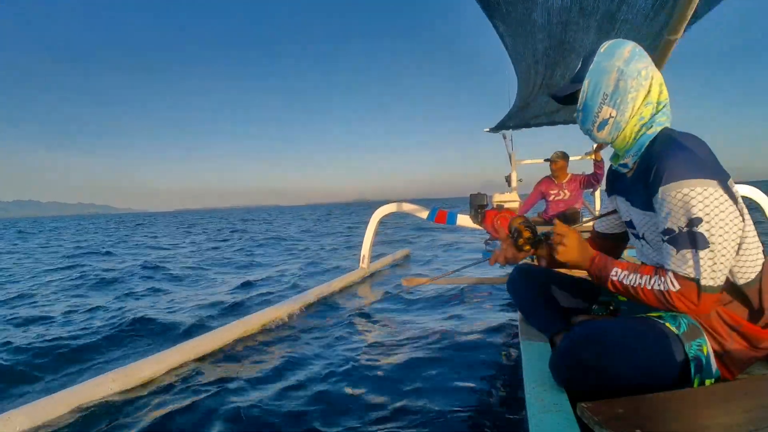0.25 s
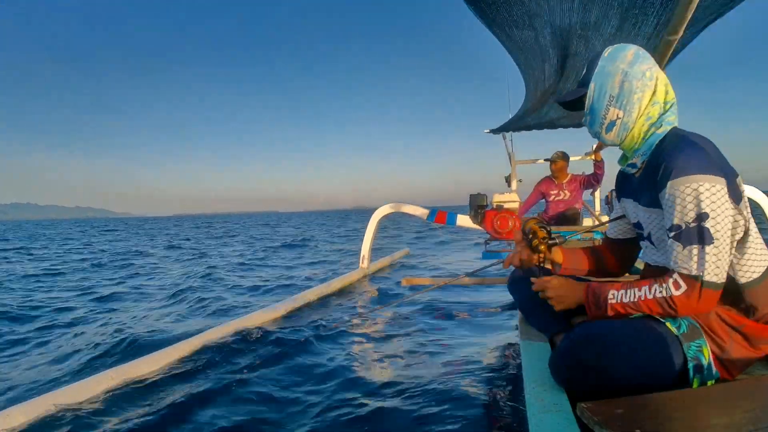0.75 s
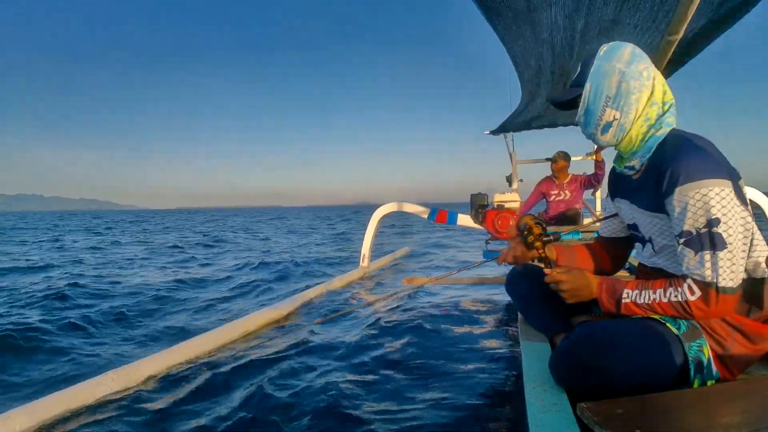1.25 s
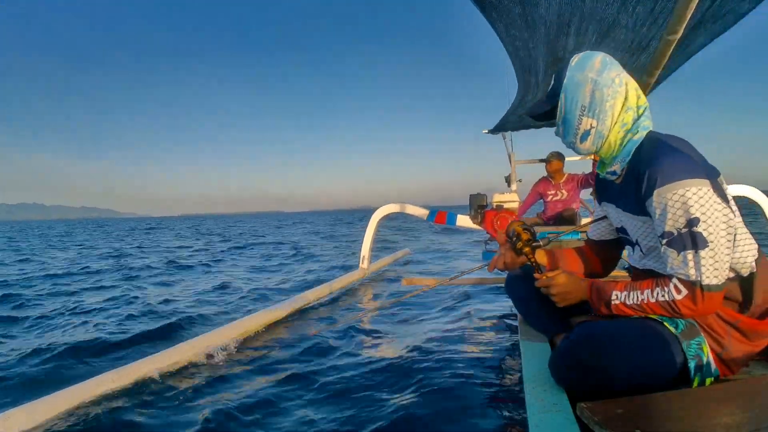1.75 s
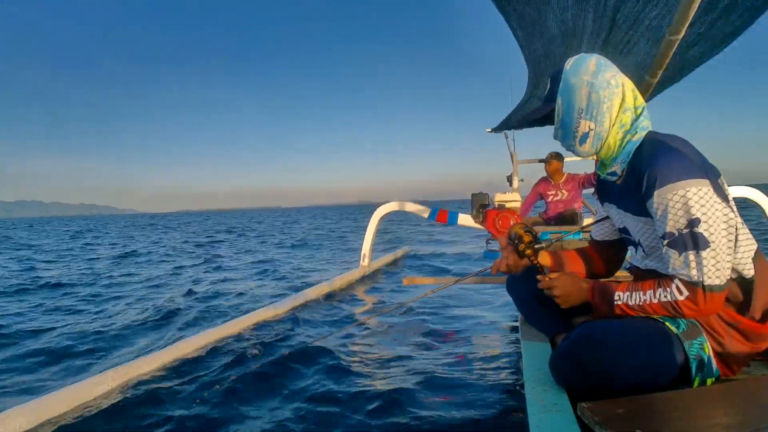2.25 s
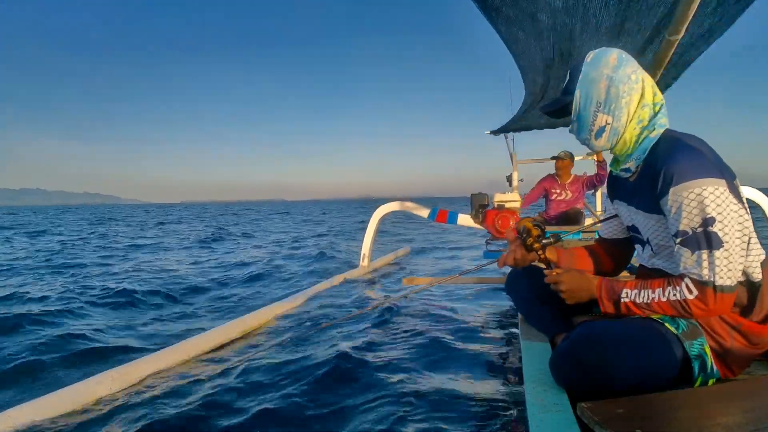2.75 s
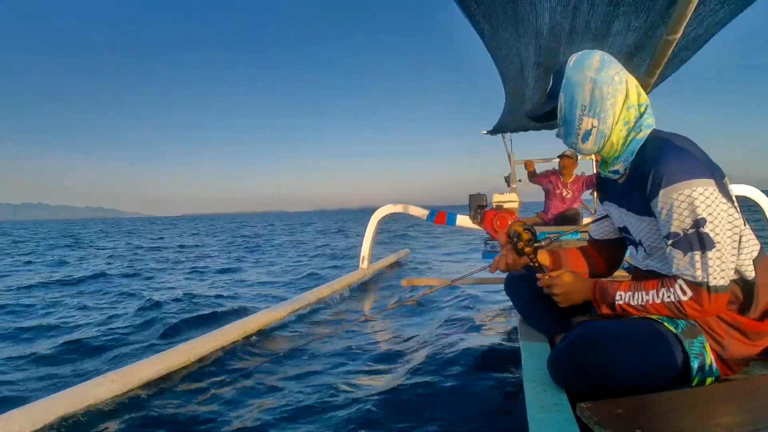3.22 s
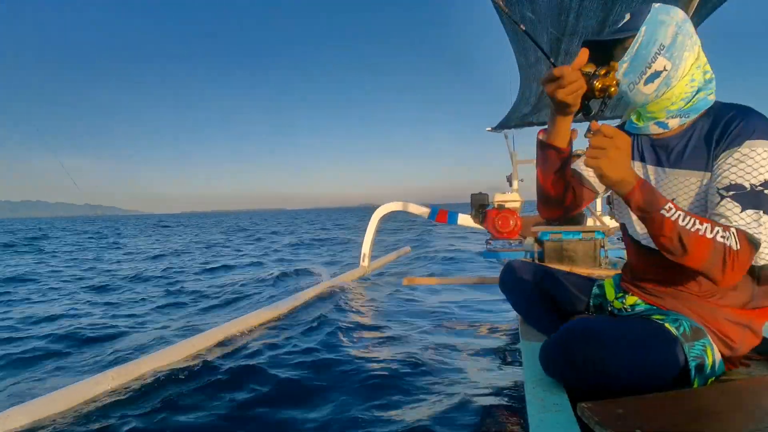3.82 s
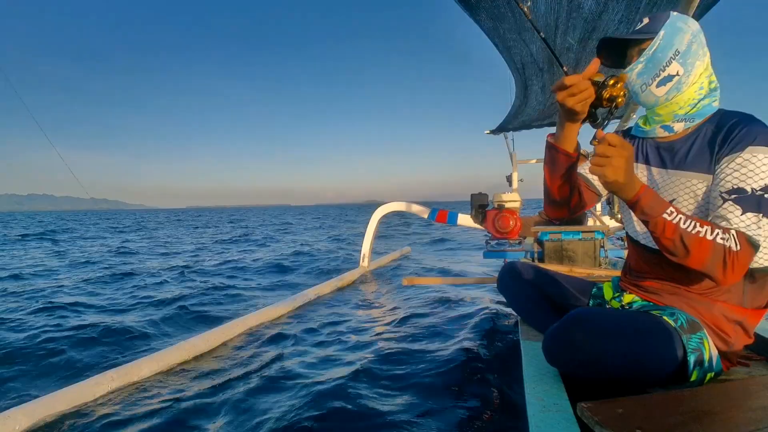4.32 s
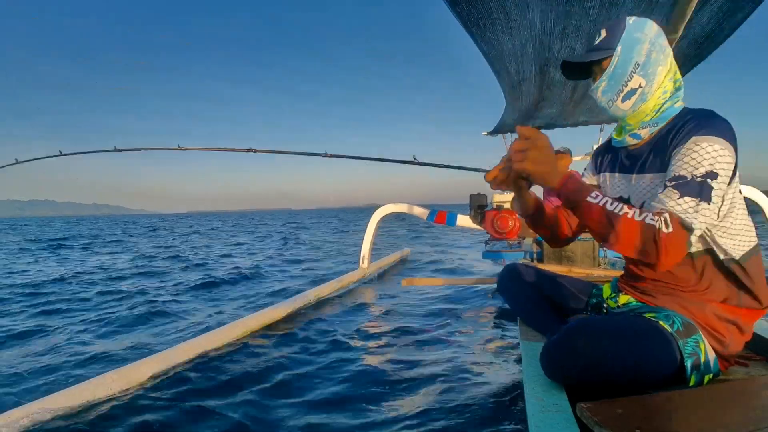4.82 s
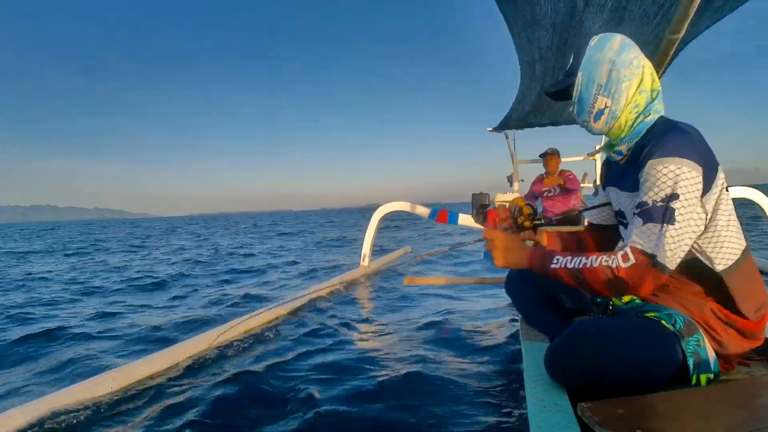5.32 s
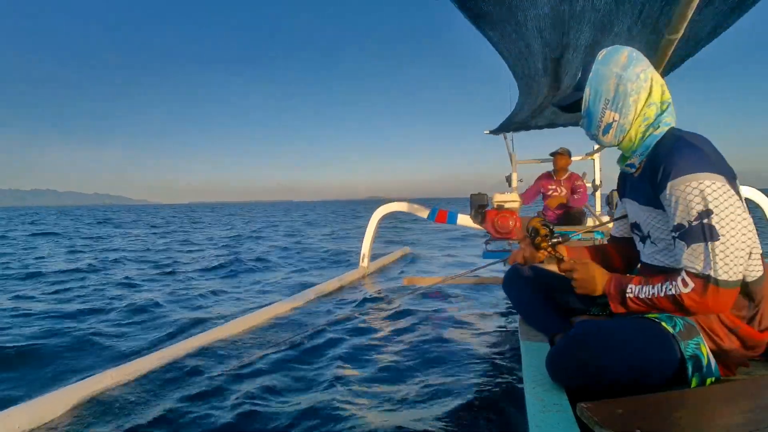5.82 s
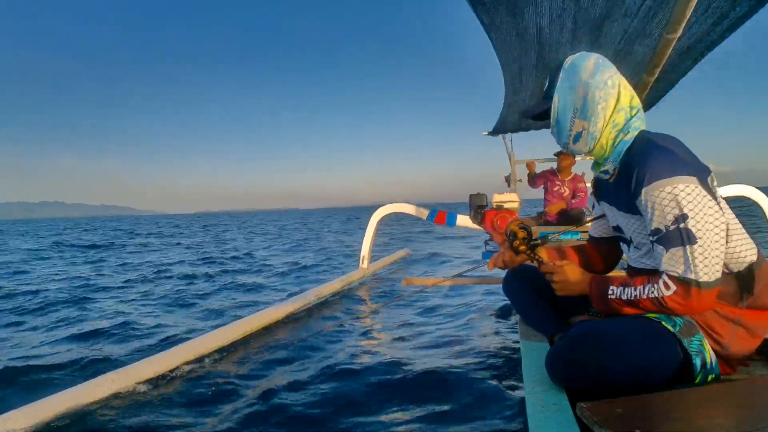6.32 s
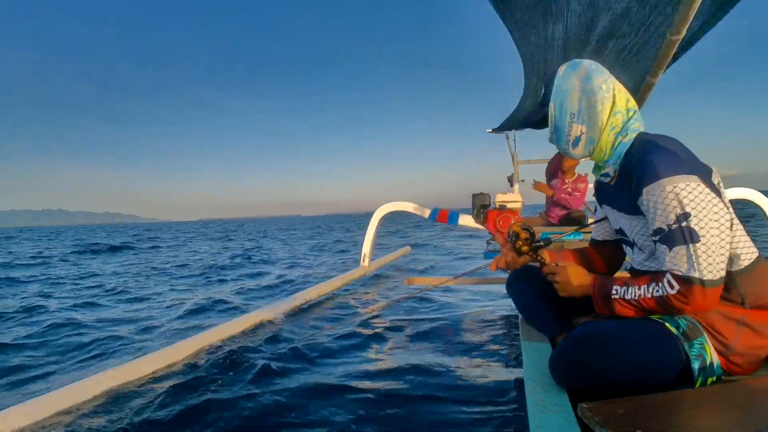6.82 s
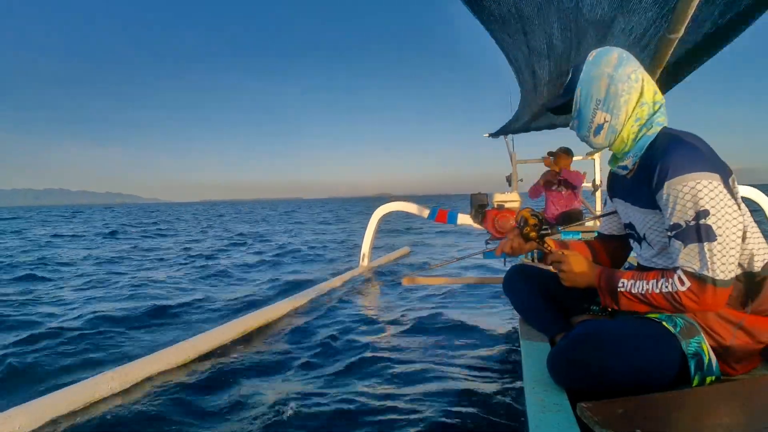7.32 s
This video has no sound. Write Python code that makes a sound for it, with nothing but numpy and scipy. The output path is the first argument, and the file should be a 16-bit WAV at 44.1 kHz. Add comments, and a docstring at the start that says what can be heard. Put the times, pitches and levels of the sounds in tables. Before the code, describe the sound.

On a small wooden boat at sea, deep wind buffets thud on the exposed microphone throughout. Close water gurgles and fizzes along the hull with bubbles popping. A reel whirs at the start, slowing to a stop after one second; a second, louder whir comes around five seconds with a sharp splash. Knocking slaps and livelier splashing follow. Open water hisses faintly behind.

```python
"""Outrigger boat at sea, in the wind

A small camera microphone on board is buffeted by wind: noise pressed on the membrane in gusts.
Along the hull wavelets gurgle and fizz (crowds of dying tones over hiss), single bubbles pop and
droplets spray (noise bursts). Slaps ring the planks, and close by a fishing reel whirs twice, its
gear teeth pulsing friction noise. Far off, open water hisses evenly."""
import sys
import numpy as np
from scipy import signal
from scipy.fft import rfft, irfft
from scipy.io import wavfile
from scipy.ndimage import uniform_filter1d

SR = 44100
rng = np.random.default_rng(int(sys.argv[2]) if len(sys.argv) > 2 else 0)


def wav_out(sig):
    """Save sig, one row per channel (or a flat mono array), as 16-bit PCM at SR to the path in sys.argv[1]."""
    wavfile.write(sys.argv[1], SR, np.round(np.clip(np.atleast_2d(sig).T, -1, 1) * 32767).astype(np.int16))


N = 333616  # length in samples

# Far off, the colour of open water. Each row: frequency in Hz, relative level in dB per Hz.
SEA_SPECTRUM = [(88, -44), (150, 14.5), (563, -8.5), (657, -11), (1270, -54), (4010, -18), (6780, -22.5),
                (14500, -21.5), (15600, -26)]
SEA_DB = -43.5  # rms

# Along the hull, water working between wavelets. Each row: time in seconds, level in dB.
LAPPING_LEVEL = [(0, -47), (.35, -46.5), (.85, -44.5), (1.1, -50.5), (1.35, -44), (1.8, -42), (2.3, -41.5),
                 (2.65, -44.5), (3.3, -42.5), (3.6, -44), (4.2, -47.5), (4.8, -46), (5.35, -38),
                 (5.65, -41.5), (6.0, -44.5), (6.65, -39.5), (7.0, -45), (7.56, -37.5)]
LAPPING_BRIGHT_DB = -1.5  # brightness between wavelets, dB gained per octave
# Wavelets breaking on the hull. Each row: peak in seconds, peak level in dB, seconds to rise 10 dB,
# seconds to fall 10 dB (0 stops at once), brightness in dB gained per octave.
WAVELETS = [(.48, -41, 0.13, 0.1, 0.1), (.71, -39.5, 0.18, 0.07, -2), (1.04, -47, .04, 0.1, -1),
            (1.26, -42.5, .12, 0, 0), (1.46, -41, .1, 0, 1), (1.63, -39, 0.02, 0.2, -2.5),
            (1.83, -42.5, 0.1, 0.7, 2), (1.95, -36.5, 0.03, 0.17, -1.5), (2.09, -39.5, 0.13, .06, 0.5),
            (2.49, -40, 0.03, 0.17, 0), (2.83, -34.5, .15, .22, 1.3), (2.95, -30.5, 0.14, 0.18, -3.5),
            (3.82, -34.5, .14, 0.06, 1.5), (4.05, -35, 0.09, 0.08, -.6), (4.25, -37.5, .05, 0.15, -4.5),
            (4.44, -34, 0.09, 0.11, -2.5), (4.68, -40.5, 0.14, 0.15, -7), (5.045, -26, 0.08, 0.12, 1),
            (5.24, -38.5, 0.07, 0.15, -1.2), (5.795, -28, .02, .055, -6.5), (6.07, -34, .025, .15, .8),
            (6.12, -30.5, .06, .11, -4.5), (6.2, -35, .1, .12, 0.4), (6.46, -34, 0.13, 0.06, -4.5),
            (6.85, -39.5, 0.15, .1, -1.5), (7.06, -34, 0.1, .07, -0.5), (7.17, -35, 0.1, 0.18, 2.5),
            (7.33, -34, 0.06, 0, -5), (7.5, -33, .16, .25, -1.5)]
# Colour of the lapping water. Each row: frequency in Hz, relative level in dB per Hz.
WATER_SPECTRUM = [(120, -25), (250, 0), (500, 0.5), (900, 1.5), (1700, -0.5), (3000, -2), (5200, -8),
                  (7000, -11.5), (13500, -24), (15800, -21)]

# Single bubbles that ring out clearly. Each row: start in seconds, peak in dB, starting pitch in Hz.
POPS = [(.133, -34, 1490), (.198, -32, 3000), (.708, -31, 560), (1.017, -31.5, 1830), (1.152, -33.5, 790),
        (1.246, -31, 2200), (1.281, -30.5, 840), (1.398, -32, 1800), (1.428, -28, 1820),
        (1.458, -24.5, 1400), (1.474, -29, 1400), (1.51, -30, 3100), (1.527, -29, 3600), (1.619, -25, 725),
        (1.725, -29.5, 4760), (1.747, -24, 1450), (1.825, -29.5, 2590), (1.931, -24.5, 1350),
        (1.943, -27, 900), (1.975, -29, 4260), (2.14, -31, 1650), (2.162, -31, 1600), (2.21, -30.5, 1440),
        (2.333, -14.5, 1543), (2.467, -29, 1770), (2.553, -31, 600), (2.557, -28, 2300),
        (2.796, -25.5, 1620), (2.847, -19.5, 1680), (2.855, -26, 950), (2.966, -29, 740),
        (3.094, -30, 1860), (3.131, -23.5, 3520), (3.173, -30.5, 750), (3.263, -31, 1750),
        (3.698, -30, 2300), (3.738, -27, 970), (3.784, -29, 3410), (3.84, -28, 1710), (3.954, -30, 2200),
        (3.775, -30, 700), (3.81, -30, 720), (3.865, -29, 900), (4.026, -30, 1210), (4.045, -29, 780),
        (4.086, -29.5, 1350), (4.237, -28.5, 1160), (4.412, -26, 936), (4.445, -25, 1020),
        (4.466, -27, 890), (4.518, -29.5, 1540), (4.694, -27, 3300), (4.859, -28.5, 1970),
        (4.938, -27, 1450), (4.968, -29, 1410), (4.988, -13, 2500), (4.992, -21, 1080), (5.018, -18, 2670),
        (5.052, -24, 1750), (5.143, -27, 1050), (5.158, -27, 2250), (5.194, -24, 1620), (5.226, -26, 1695),
        (5.24, -22.5, 1600), (5.271, -22, 2050), (5.281, -22, 3330), (5.375, -28, 1200),
        (5.593, -28.5, 1094), (5.689, -31, 930), (5.777, -20, 1250), (5.79, -25, 1050), (5.808, -21, 1050),
        (5.822, -27, 680), (6.043, -30.5, 930), (6.323, -30, 764), (6.422, -29, 1230), (6.515, -31, 540),
        (6.771, -26, 1270), (6.817, -30, 1410), (6.856, -29, 1000), (6.94, -28.5, 1960), (7.017, -28, 940),
        (7.04, -25, 3670), (7.044, -28, 1050), (7.066, -24, 1155), (7.078, -17, 1570), (7.156, -25, 1670),
        (7.168, -27, 1500), (7.184, -19, 2490), (7.228, -23.5, 2560), (7.385, -29, 1650),
        (7.452, -29, 1320), (7.497, -21.5, 1290)]

# Spray thrown up near the microphone. Each row: start in seconds, peak of the larger drops in dB,
# their t60 in seconds, level of the finest droplets in dB rms.
SPRAYS = [(0.1993, -25, .028, -52.5), (0.481, -23.5, .057, -42), (1.018, -22, 0.041, -51),
          (1.045, -31, .03, -48), (1.2585, -22.5, 0.036, -53), (1.3536, -25, .075, -47),
          (1.3786, -25, 0.037, -52), (1.6181, -27, .028, -60), (1.7245, -23.5, 0.035, -46),
          (1.977, -24, .06, -45), (2.039, -34, .025, -44), (2.133, -40, .02, -45),
          (2.258, -24.5, 0.037, -41.5), (2.334, -14, 0.073, -33), (2.4582, -27, .025, -52),
          (2.55, -32, .03, -48), (2.756, -24, .04, -51), (2.8175, -24, .04, -55), (3.0645, -25, 0.06, -49),
          (3.1313, -28, .025, -56), (3.172, -29, .034, -50), (3.763, -26.5, .04, -42),
          (3.7854, -28, .047, -47), (3.8088, -26, .06, -37.5), (3.8383, -17, .035, -34.5),
          (3.9969, -30, 0.043, -43), (4.1276, -30, .027, -51), (4.15, -27, .048, -48),
          (4.229, -27.5, 0.052, -46), (4.6933, -23, .025, -42), (4.8586, -23, .033, -37),
          (4.9062, -24, .04, -49), (4.9696, -28, .04, -37), (4.9884, -7.5, .04, -26), (5.0, -19, .05, -38),
          (5.014, -14, .05, -38), (5.024, -5, .082, -28), (5.1293, -22, .032, -32.5),
          (5.2266, -22, .04, -45), (5.2804, -23, .033, -40), (5.2898, -19, 0.061, -37),
          (5.903, -33, .03, -46), (5.96, -33, .03, -48), (6.0543, -22, .031, -46),
          (6.082, -23.5, 0.084, -42), (6.1394, -24, 0.055, -41), (6.305, -30, .04, -44),
          (6.3227, -20, .028, -44), (6.402, -27, 0.094, -44), (6.4211, -16.5, 0.13, -49),
          (6.4678, -22.5, 0.1, -46), (6.5086, -26.5, .035, -47), (6.821, -24.5, .036, -40),
          (6.8455, -26, .04, -44), (6.8918, -23, .027, -41), (6.938, -21, .05, -40), (6.948, -21, .04, -33),
          (6.988, -20, .036, -39), (7.031, -24, .059, -36), (7.0379, -16, .025, -33),
          (7.064, -23, .05, -40), (7.077, -19, .035, -43), (7.096, -26, .044, -42),
          (7.1527, -23, .044, -45), (7.1756, -13.5, .04, -34.5), (7.185, -20, .06, -41),
          (7.21, -30, .04, -43), (7.253, -27, 0.039, -44), (7.2696, -27, .055, -51),
          (7.3733, -21, 0.055, -43.5)]
STRAYS_PER_S = 6  # faint stray sprays at random moments
STRAY_DB, STRAY_FINE_DB = -32, -52  # the loudest of them: peak dB, finest droplets dB rms
GRIT_DB, GRIT_HZ = 5.5, 300  # unevenness of landing droplets: rms depth, speed
# Colours of large, middle and fine drops. Each row: frequency in Hz, relative level in dB per Hz.
LARGE_DROPS = [(600, -9), (1400, 3.0), (2400, 4), (3200, -9.5), (5000, -35)]
MIDDLE_DROPS = [(1800, -25), (2900, 2.5), (3800, 2.5), (5300, -0.5), (7000, -11.5), (9000, -45)]
FINE_DROPS = [(3000, -60), (6000, -1.5), (8000, -1.0), (13500, -9.0), (15800, -5.5)]

# Wavelets slapping the planks. Each row: start in seconds, peak of the knock in dB, starting pitch
# of the trapped air in Hz, its t60 in seconds, its level in dB, sharpness of the front (a ratio).
SLAPS = [(1.618, -15, 394, 0.085, -26, 1.1), (2.858, -11.5, 586, 0.079, -29, 3.1),
         (3.737, -22, 899, 0.07, -30, 4), (4.236, -19, 339, 0.082, -27, 2.5),
         (4.273, -21, 304, 0.07, -21.5, 4.9), (4.414, -13.5, 320, 0.1, -19.5, 2.8),
         (4.445, -20, 278, 0.052, -34, 3.0), (4.659, -21, 562, 0.07, -30, 4),
         (5.706, -25, 260, 0.093, -27.5, 3.0), (5.78, -11.5, 350, 0.07, -33, 2.3),
         (5.808, -15.5, 357, 0.096, -23, 2.7), (6.106, -27, 583, 0.094, -17.5, 3.0),
         (6.471, -23, 398, 0.084, -25, 3.4)]
# Ringing of the planks. Each row: frequency in Hz, relative level in dB, t60 in seconds.
HULL_RINGS = [(395, 7.5, 0.017), (610, 1, 0.033), (790, -10.5, 0.026), (900, -5, 0.034), (1180, 0.5, 0.044),
              (1600, 11.5, 0.0062), (2050, 7, 0.0063), (2980, -8, 0.007)]

# Close by, the reel, one list a run. Each row: time in seconds, level in dB before the rings
# add theirs, gear teeth per second.
REEL_RUNS = [
    [(0, -45, 290), (.25, -46, 280), (.4, -47.5, 210), (.7, -46, 225), (.8, -48, 120), (.9, -53, 66),
     (1.0, -58, 45)],
    [(4.49, -53, 144), (4.6, -43.5, 250), (4.8, -41.5, 280), (4.9, -42, 280), (5.0, -35, 370),
     (5.15, -38, 350), (5.29, -42, 330), (5.4, -40.5, 285), (5.56, -47.5, 240), (5.66, -54, 100)],
]
# Colour of the reel's body. Each row: frequency in Hz, relative level in dB per Hz.
REEL_BODY = [(1500, -50), (2200, -6), (2800, -5.5), (5500, -4.5), (6200, -9.5), (7500, -11.5), (8200, -7),
             (11000, -7.5), (13400, -2.5), (14400, -17), (15700, -7)]
# Rings of the body. Each row: frequency in Hz, width in Hz, mean boost in dB.
REEL_RINGS = [(3100, 250, 5.5), (5200, 660, 1.5), (8000, 500, 4), (10000, 680, 4.), (11500, 500, 2),
              (12900, 970, -3), (15000, 500, 3.)]
# The reel's top sheen swells or dips briefly. Each row: peak in seconds, change in dB, width in seconds.
REEL_SHEEN = [(.1, 5, .1), (4.72, -7, 0.11), (4.98, -7, .06), (5.18, 5, .05), (5.42, 7, .07)]
REEL_FRAME_DB = 1.5  # boost of the reel below about 6500 Hz

# At the microphone, the colour of the wind. Each row: frequency in Hz, relative level in dB per Hz.
WIND_SPECTRUM = [(2.4, -28), (4.0, 1.5), (16, -1.5), (44, 2), (73, -2.5), (182, -20.5), (420, -43),
                 (550, -99), (920, -120)]
# Steady breeze. Each row: time in seconds, level in dB, small eddies in dB against large.
BREEZE = [(0, -26.5, -4), (.4, -23.2, -5), (.8, -22.5, -5), (1.2, -25.5, -5), (1.6, -25.1, -3),
          (2.1, -27.5, -1.5), (2.5, -27, -1.5), (2.95, -28.5, -1.5), (3.3, -29, .5), (3.9, -26, -1.5),
          (4.4, -24, -2.5), (4.75, -31, -3), (5.15, -27.8, -5), (5.5, -23, -3), (6.05, -30, -4),
          (6.5, -26.5, -5), (7.0, -30.3, -5), (7.56, -25.5, -1.5)]
# Buffets, short thuds of air. Each row: peak in seconds, peak level in dB, width in seconds,
# small eddies in dB against large.
BUFFETS = [(0.058, -16, 0.03, -12), (0.329, -12, 0.028, -0.4), (0.431, -17, 0.028, -5.5),
           (0.512, -10.5, 0.04, -6.5), (0.722, -14.5, 0.028, -6), (0.853, -15, 0.11, -3.5),
           (1.32, -21.4, 0.03, -2.8), (1.537, -22, 0.057, -3), (1.713, -12.5, 0.039, -13.5),
           (1.878, -16.6, 0.066, -5), (2.375, -15.8, 0.112, -9.5), (2.551, -15, 0.031, -1),
           (2.63, -20, 0.036, 7), (2.792, -13, 0.062, -7), (3.389, -18.5, 0.027, -10.2),
           (3.731, -10, 0.07, -17.4), (4.188, -19, 0.03, -4.5), (4.282, -12, 0.037, -7),
           (4.446, -9.5, 0.038, -4.0), (4.531, -14.5, 0.048, -0.6), (5.274, -18.2, 0.062, -6.4),
           (5.547, -18.5, 0.15, -4.5), (5.665, -13, 0.046, -5), (5.793, -15.8, 0.039, -7.5),
           (6.43, -17.2, 0.098, -5), (6.622, -18.5, 0.071, -11), (6.729, -19, 0.03, -7.2),
           (6.875, -13.5, 0.048, -6.3), (6.949, -15.0, 0.033, -10), (7.059, -14.5, 0.111, -8.3),
           (7.229, -17, 0.094, -3), (7.578, -11, 0.099, -2), (.29, -18, .035, 2.5), (2.16, -23, .04, -.7),
           (3.09, -24, .05, -5), (3.5, -24, .04, -3), (4.1, -23, .06, -2.3), (6.08, -25, .05, -5),
           (6.29, -23, .035, -8), (7.418, -22, .035, -5)]

# The converter's resting level drifts. Each row: time in seconds, offset (1 is full scale).
CONVERTER_OFFSET = [(0, -.041), (2, -.048), (7.56, -.054)]


def gain_of(db):
    """Amplitude factor of a level in dB."""
    return 10 ** (np.asarray(db) / 20)


def evened(x):
    """x brought to rms 1."""
    return x / np.sqrt(np.mean(x ** 2) + 1e-20)


def read(points, hz):
    """Reads a spectrum table at hz, straight between its points on a log frequency scale."""
    f, value = np.transpose(points)
    return np.interp(np.log(hz + 1), np.log(f + 1), value)


def columns(rows, t):
    """Every column of a curve table at the times t."""
    s, *rest = np.transpose(rows)
    return [np.interp(t, s, column) for column in rest]


def add(mix, s, sound):
    """Adds a sound to the mix at s seconds, cut off at the end of the mix."""
    part = mix[round(s * SR):][:len(sound)]
    part += sound[:len(part)]


def colour(x, points):
    """Filters x by a spectrum table, then brings it to rms 1."""
    hz = np.fft.rfftfreq(len(x), 1 / SR)
    return evened(irfft(rfft(x) * gain_of(read(points, hz)), len(x)))


def drift(top_hz):
    """Random wandering of rms 1, with little movement faster than top_hz."""
    hz = np.fft.rfftfreq(N, 1 / SR)
    slowness = (hz > 0) / (1 + (hz / top_hz) ** 4)
    return evened(irfft(rfft(rng.standard_normal(N)) * slowness, N))


def blend(base_db, base_value, swells):
    """Adds swells (level dB, value) to a base as power; the value leans to the strongest."""
    power = gain_of(base_db) ** 2
    weighted = power * base_value
    for db, value in swells:
        power = power + gain_of(db) ** 2
        weighted = weighted + gain_of(db) ** 2 * value
    return np.sqrt(power), weighted / power


def bubble(hz, t60, rise, start=0.0002):
    """A dying tone that climbs as the bubble nears the surface."""
    t = np.arange(round(t60 * SR) + 8) / SR
    tone = np.sin(2 * np.pi * hz * t * (1 + rise * t / t60))
    return tone * gain_of(-60 * t / t60) * (1 - np.exp(-t / start))


def sea():
    """The smooth far hiss of open water: steady coloured noise."""
    return gain_of(SEA_DB) * colour(rng.standard_normal(N), SEA_SPECTRUM)


def crowd(per_s, spread_db, cycles, low_hz, high_hz):
    """Bubbles of 40 sizes at random moments, a few of them loud."""
    loudness = gain_of(spread_db * np.minimum(rng.exponential(1, N), 5))
    starts = loudness * (rng.random(N) < per_s / SR)
    kind = rng.integers(0, 40, N)
    out = np.zeros(N)
    pitches = np.geomspace(low_hz, high_hz, 40)
    for k, (hz, (long, rise)) in enumerate(zip(pitches, rng.random((40, 2)))):
        t60 = cycles * (0.52 + 0.69 * long) / hz + 0.0059
        tone = bubble(hz, t60, 0.22 * rise, 1.9 / hz)
        tone = tone / np.linalg.norm(tone) * np.sqrt(hz)
        out += signal.oaconvolve(starts * (kind == k), tone)[:N]
    return evened(out)


def surges(t):
    """Level and brightness of the lapping: each wavelet climbs and dies at a steady dB rate."""
    peaks = ((db - 10 * np.where(t < s, (s - t) / up, (t - s) / down), bright)
             for s, db, up, down, bright in WAVELETS)
    return blend(columns(LAPPING_LEVEL, t)[0], LAPPING_BRIGHT_DB, peaks)


def lapping(fizz=1.6, patchy_db=1.44, flicker_db=0.5):
    """Crowds of bubbles over fizz, in patches, surging with each wavelet."""
    mixed = crowd(per_s=6000, spread_db=3.6, cycles=38.6, low_hz=248.6, high_hz=5497)
    mixed = mixed + fizz * rng.standard_normal(N)
    mixed = colour(mixed, WATER_SPECTRUM) * gain_of(flicker_db * drift(26))
    hz, t, z = signal.stft(mixed, SR, nperseg=256, noverlap=192)
    # random patches, smoothed over time and then over pitch
    patches = uniform_filter1d(rng.standard_normal(z.T.shape), size=30, axis=0)
    patches = evened(uniform_filter1d(patches, size=5, axis=1)).T
    level, bright_db = surges(t)
    octaves = np.log2(np.clip(hz, 300, 6000) / 1500)[:, None]
    tilt = gain_of(octaves * np.clip(bright_db, -6, 3))
    power = np.mean(abs(z) ** 2, 1, keepdims=True)
    tilt = tilt * np.sqrt(power.sum() / (power * tilt ** 2).sum(0))  # colour changes, level stays
    z = z * tilt * level * gain_of(patchy_db * patches)
    return signal.istft(z, SR, nperseg=256, noverlap=192)[1][:N]


def pops(rise=0.12, start_cycles=0.25):
    """Single bubbles ringing out clearly above the crowd, the deep ones for longer."""
    out = np.zeros(N)
    for s, db, hz in POPS:
        t60 = 0.013 + 28 / hz  # a fixed part plus 28 cycles
        tone = bubble(hz, t60, rise, start_cycles / hz)
        add(out, s, gain_of(db) * tone / tone.max())
    return out


def spray(start=0.0012, fine_start=0.003, fine_sooner=1.28):
    """Bursts of droplets that swell in a few ms; large, middle and fine drops land unevenly."""
    large, middle, fine = (
        np.resize(rng.standard_normal(N) * gain_of(GRIT_DB * drift(GRIT_HZ)), N + 5000)
        for _ in range(3))
    low = 0.96 * colour(large, LARGE_DROPS) + colour(middle, MIDDLE_DROPS)
    high = colour(fine, FINE_DROPS)
    out, t = np.zeros(N), np.arange(5000) / SR
    # strays: any moment, up to 8 dB under the loudest, t60 of 0.02 to 0.04 s
    strays = rng.random((round(STRAYS_PER_S * N / SR), 4)) * [N / SR, -8, .02, -8]
    strays = strays + [0, STRAY_DB, .02, STRAY_FINE_DB]
    for s, db, t60, fine_db in list(SPRAYS) + list(strays):
        at = round(s * SR)
        fall = gain_of(-60 * t / t60)
        burst = low[at:at + len(t)] * fall * (1 - np.exp(-t / start))
        add(out, s, gain_of(db) * burst / abs(burst).max())
        swell = fall ** fine_sooner * (1 - np.exp(-t / fine_start))  # fine drops die sooner
        mist = high[at:at + len(t)] * swell
        mist = mist * np.linalg.norm(swell) / np.linalg.norm(mist) / swell.max()
        add(out, s, gain_of(fine_db) * mist)
    return out


def slaps(push_s=0.0053, front_s=0.00015):
    """A sharp front and a ragged push of water ring the planks; trapped air plops."""
    out, t = np.zeros(N), np.arange(4000) / SR
    ring = sum(gain_of(db - 60 * t / t60) * np.sin(2 * np.pi * hz * t) for hz, db, t60 in HULL_RINGS)
    rags = rng.standard_normal((len(SLAPS), 1200))
    for (s, db, hz, t60, plop_db, front), rag in zip(SLAPS, rags):
        push = rag * np.exp(-t[:1200] / push_s) + front * np.exp(-t[:1200] / front_s)
        knock = signal.fftconvolve(push, ring)
        add(out, s, gain_of(db) * knock / abs(knock).max())
        add(out, s, gain_of(plop_db) * bubble(hz, t60, rise=0.04, start=0.0038))
    return out


def reel(depth=0.76, tick_s=0.0013, shine_hz=12800, waver_db=3.0):
    """Passing gear teeth puff friction noise into the body; its rings waver as the handle turns."""
    out = np.zeros(N)
    for rows in REEL_RUNS:
        t = np.arange(rows[0][0], rows[-1][0], 1 / SR)
        level_db, rate = columns(rows, t)
        since_tooth = (np.cumsum(rate) / SR % 1) / rate  # seconds
        teeth = 1 - depth + depth * np.exp(-since_tooth / tick_s)
        teeth = teeth / np.sqrt(uniform_filter1d(teeth ** 2, size=2000))
        rub = colour(rng.standard_normal(len(t)) * teeth, REEL_BODY)
        hz, at, z = signal.stft(rub, SR, nperseg=256)
        hz = hz[:, None]
        sheen_db = sum(db * np.exp(-((at + t[0] - s) / width) ** 2) for s, db, width in REEL_SHEEN)
        gain_db = np.exp(-((hz - shine_hz) / 1200) ** 2) * sheen_db
        gain_db = gain_db + REEL_FRAME_DB / (1 + (hz / 6500) ** 12)
        for ring_hz, width, db in REEL_RINGS:
            waver = waver_db * np.interp(at, np.arange(N) / SR, drift(4.2))
            gain_db = gain_db + (db + waver) / (1 + (2 * (hz - ring_hz) / width) ** 2)
        whir = signal.istft(z * gain_of(gain_db), SR, nperseg=256)[1][:len(t)]
        add(out, t[0], gain_of(level_db) * whir)
    return out


def gusts(t, skirt_db=-17.0):
    """Level and eddy size: bell-shaped buffets over the breeze, down skirt_db one width away."""
    bells = ((db + np.maximum(skirt_db * ((t - s) / width) ** 2, -80), small_db)
             for s, db, width, small_db in BUFFETS)
    return blend(*columns(BREEZE, t), bells)


def wind(lumps_db=1.5, bend=0.091, split_hz=55):
    """Eddies press on the membrane in lumps; suction peaks are sharper than pushes."""
    eddies = colour(rng.standard_normal(N), WIND_SPECTRUM)
    # chance swells are flattened, leaving the level to the gusts
    eddies = eddies / np.sqrt(uniform_filter1d(eddies ** 2, size=3000) + 0.22)
    t = np.arange(0, N + 64, 64) / SR
    level, small_db = (np.interp(np.arange(N) / SR, t, curve) for curve in gusts(t))
    # large eddies lie below the split, small ones above
    large = signal.sosfiltfilt(signal.butter(2, split_hz, fs=SR, output="sos"), eddies)
    small = evened(eddies - large) * gain_of(small_db)
    eddies = (evened(large) + small) / np.sqrt(1 + gain_of(small_db) ** 2)
    eddies = evened(eddies * gain_of(lumps_db * drift(17.3)))
    eddies = eddies - bend * (eddies ** 2 - uniform_filter1d(eddies ** 2, size=3000))
    return level * evened(eddies)


def scene():
    """All layers from far to near, on one channel."""
    return (sea() + lapping() + pops() + spray() + slaps() + reel() + wind())[None]


def record(dry):
    """The band limit at 15.5 kHz, and the converter's drifting offset."""
    lowpass = signal.firwin(1501, 15500, window=("kaiser", 9), fs=SR)
    limited = signal.oaconvolve(dry, lowpass[None], "same")
    return limited + columns(CONVERTER_OFFSET, np.arange(N) / SR)[0]


dry = scene()
out = record(dry)
wav_out(out)
```